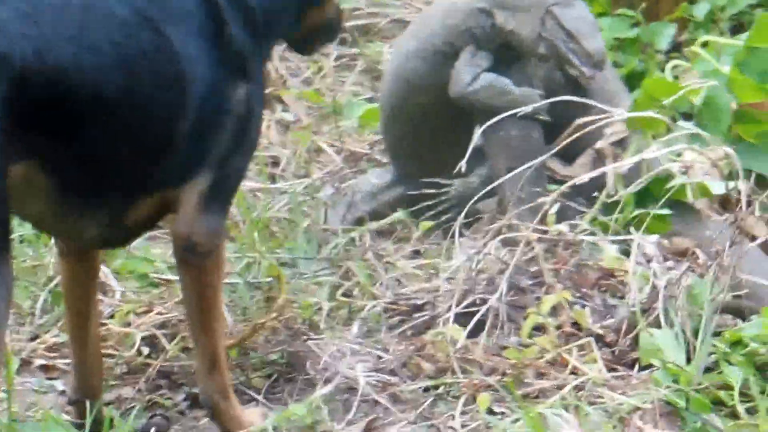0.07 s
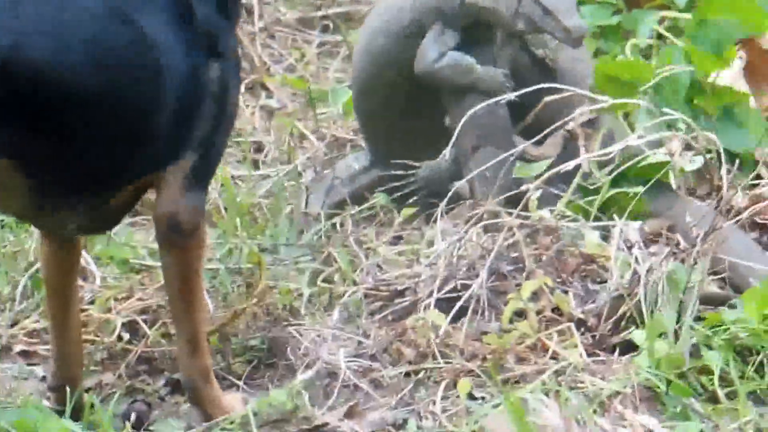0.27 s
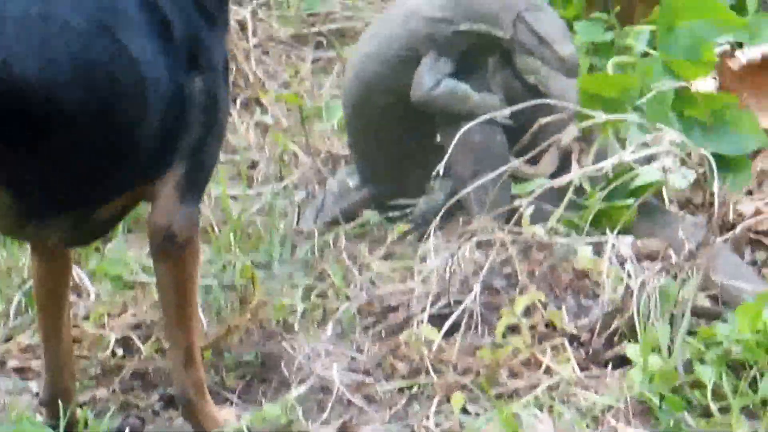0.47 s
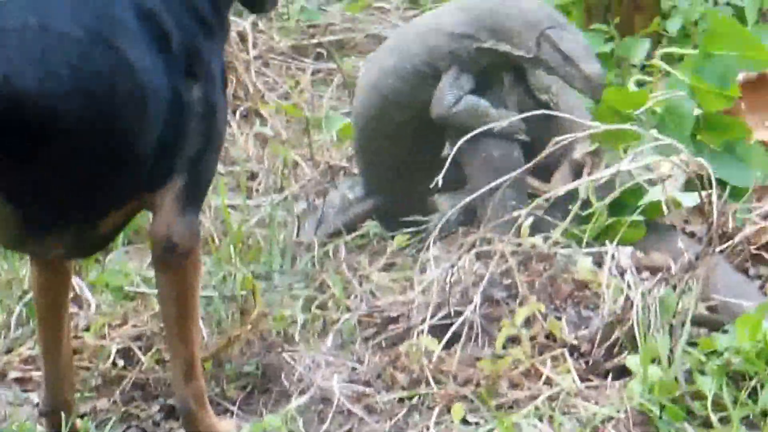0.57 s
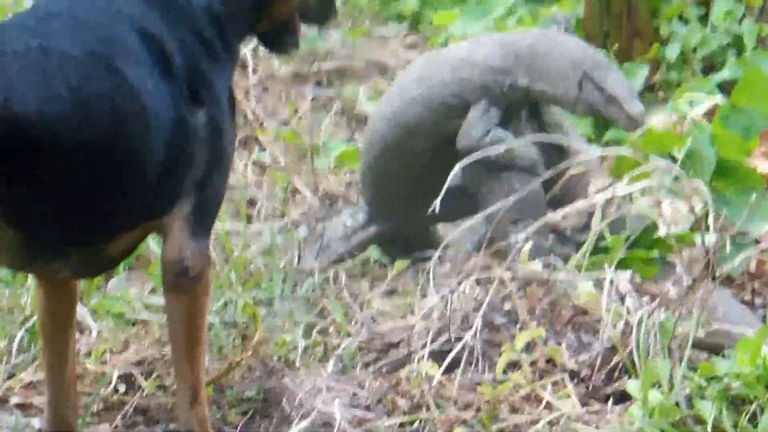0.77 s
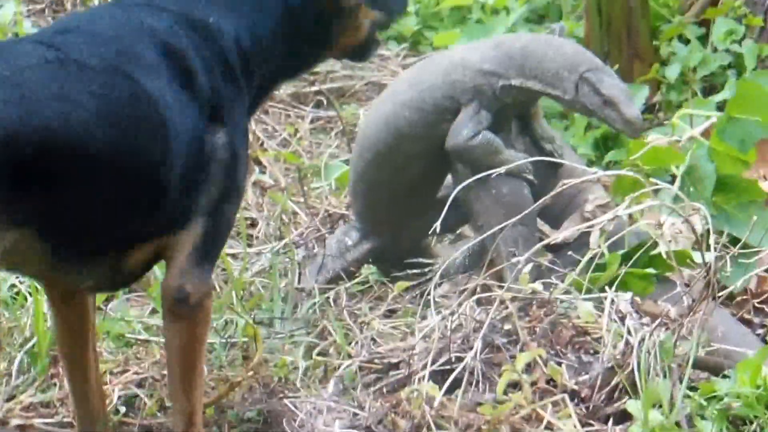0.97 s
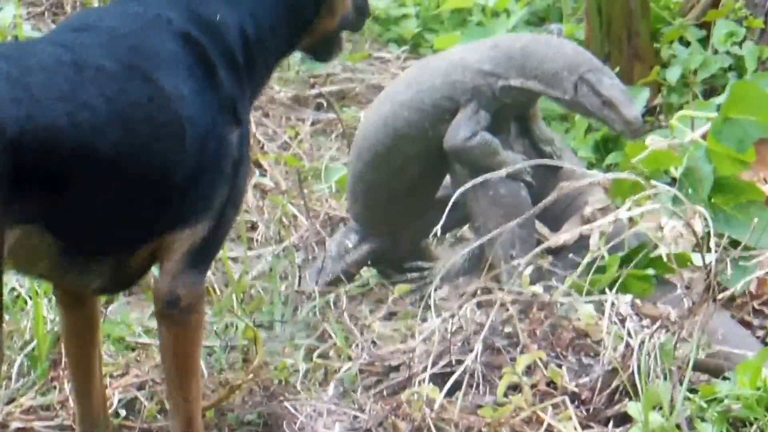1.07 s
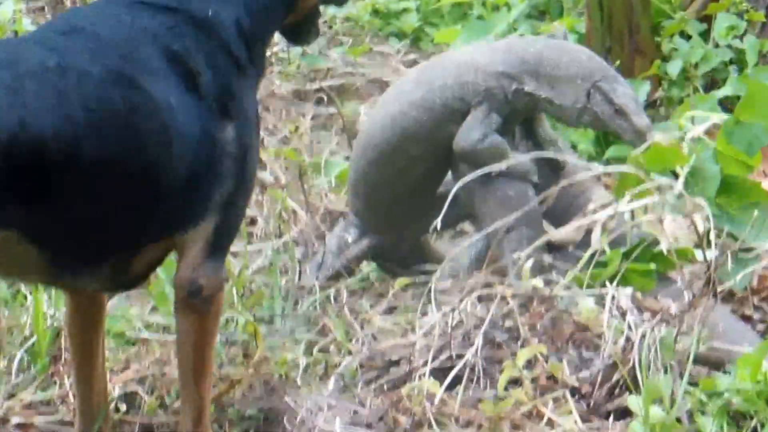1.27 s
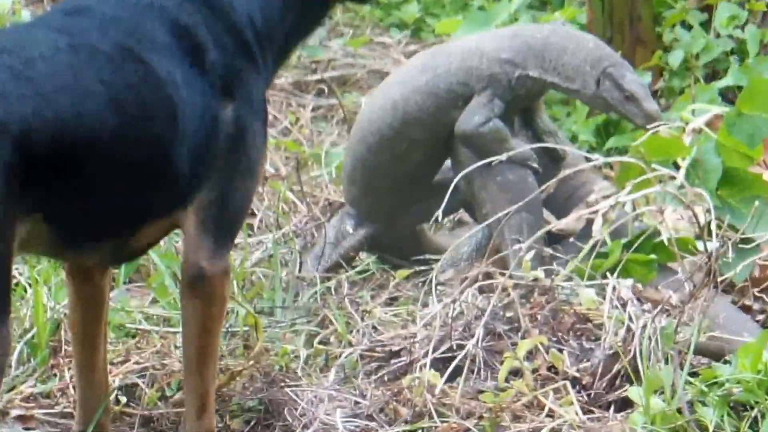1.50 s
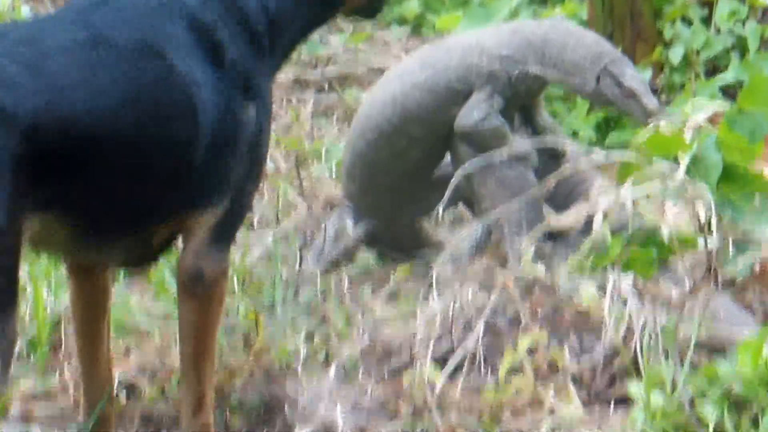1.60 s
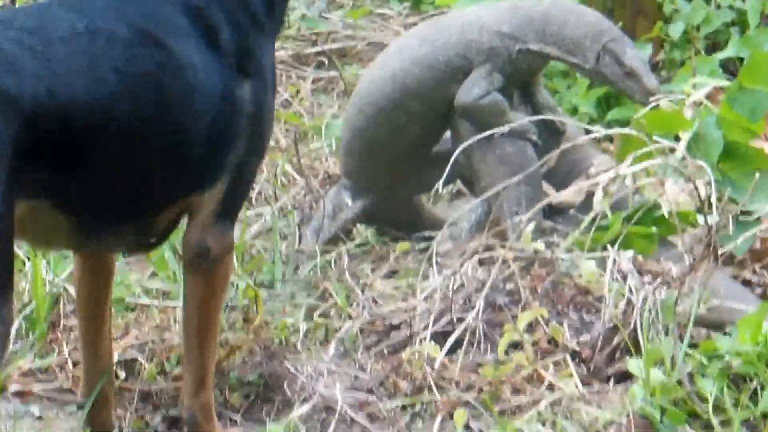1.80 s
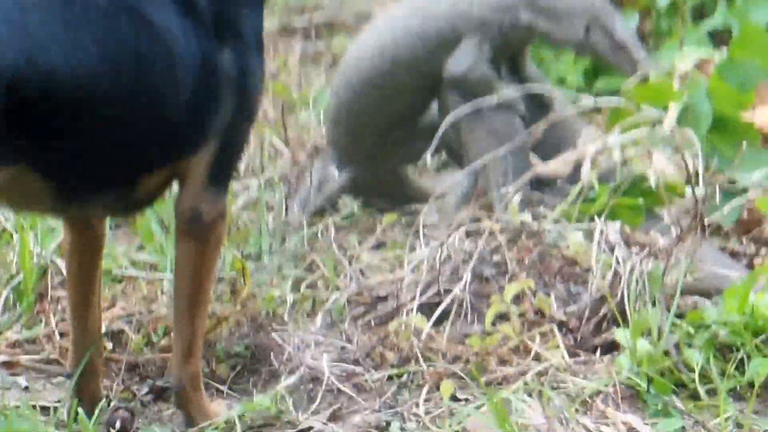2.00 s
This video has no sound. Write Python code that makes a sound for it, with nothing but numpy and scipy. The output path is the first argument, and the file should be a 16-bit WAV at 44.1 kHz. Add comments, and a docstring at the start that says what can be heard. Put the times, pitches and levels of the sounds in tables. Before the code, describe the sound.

A dog barks loudly close to the microphone in a garden. After a faint dry grass rustle, single raspy barks come at 0.2 and 0.55 seconds, then quick pairs at about 1.0 to 1.2 and 1.55 to 1.8 seconds. The peaks crackle and each bark echoes lightly. A distant dog answers faintly near 0.8 and 1.3 seconds. Soft outdoor air and faint insect hiss continue underneath.

```python
"""A garden, with a dog close to the microphone, a little to the right. It barks six times: two single
barks, then two quick pairs, its vocal folds buzzing and rasping as the mouth opens. The loudest peaks
overflow the recorder and crackle. Nearby plants and walls and the far surroundings throw the barks back,
and a dog answers from a distance. Dry grass rustles underfoot; insects hiss faintly in the soft air."""
import sys
import numpy as np
from scipy import signal
from scipy.fft import rfft, irfft, next_fast_len
from scipy.io import wavfile
from scipy.ndimage import uniform_filter1d

SR = 44100
rng = np.random.default_rng(int(sys.argv[2]) if len(sys.argv) > 2 else 0)


def persist_wave(psi):
    """Save psi, clipped to +-1, as 16-bit WAV."""
    counts = np.round(np.clip(psi, -1, 1) * 32767).astype(np.int16)
    wavfile.write(sys.argv[1], SR, np.atleast_2d(counts).T)


N = 90404


def amp(db):
    """Decibels as an amplitude factor."""
    return 10 ** (np.asarray(db) / 20)


def unit(x):
    """The signal at rms 1."""
    return x / np.sqrt(np.mean(x ** 2) + 1e-20)


def read(points, hz):
    """The value of a (frequency, value) curve at hz, on a log frequency axis."""
    f, value = np.transpose(points)
    return np.interp(np.log(hz + 1), np.log(f), value)


def add(mix, start_s, sound):
    """Lays a sound into the mix."""
    part = mix[max(round(start_s * SR), 0):][:len(sound)]
    part += sound[:len(part)]


def colour(x, spectrum):
    """Filters a sound by a (frequency [Hz], gain [dB]) curve, then sets it to rms 1."""
    size = next_fast_len(2 * len(x))
    gain = amp(read(spectrum, np.fft.rfftfreq(size, 1 / SR)))
    return unit(irfft(rfft(x, size) * gain, size)[:len(x)])


def wander(size, hz):
    """A smooth random drift up to about hz, at an rms near 1."""
    f = np.fft.rfftfreq(N, 1 / SR)
    return unit(irfft(rfft(rng.standard_normal(N)) * np.exp(-(f / hz) ** 2), N))[:size]


def air_and_insects():
    """Soft outdoor air and a narrow, wavering insect hiss, partly alike in both channels."""
    # spectrum of the open air: (frequency [Hz], relative level [dB])
    air_spectrum = [(30, -11), (200, -11), (330, -10), (600, -11), (1500, -13), (2800, -16.5), (5000, -24),
                    (9000, -30.5), (14000, -34.5)]
    air_db, insect_db, insect_hz, insect_width_hz = -51.5, -63.5, 7100, 440
    shared = rng.standard_normal(N)
    air = np.array([colour(shared + 1.2 * rng.standard_normal(N), air_spectrum) for _ in range(2)])
    band = np.exp(-((np.fft.rfftfreq(N, 1 / SR) - insect_hz) / insect_width_hz) ** 2)
    insects = unit(irfft(rfft(rng.standard_normal((2, N)) + shared) * band, N))
    return amp(air_db + wander(N, 7.1)) * air + amp(insect_db + 2 * wander(N, 2.6)) * insects


def echoes(x, t60, build_s):
    """Scattered stereo reflections build up, then each band dies at its own speed."""
    shared = rng.standard_normal(N)
    hz, t, bands = signal.stft(shared + 0.39 * rng.standard_normal((2, N)), SR, nperseg=256)
    decay = amp(-60 * t / read(t60, hz)[:, None])
    tail = signal.istft(bands * decay, SR, nperseg=256)[1][:, :N]
    tail *= 1 - np.exp(-(np.arange(N) / SR / build_s) ** 2)
    mids = signal.sosfilt(signal.butter(2, [500, 2500], "band", fs=SR, output="sos"), tail)
    mid_gain = np.sqrt((mids ** 2).sum(1, keepdims=True) * SR / 4000)
    return signal.fftconvolve(x[None], tail / mid_gain, axes=1)[:, :N]


def garden(x):
    """The garden throws sound back: a short slap from close by, a faint long tail from far off."""
    # decay off nearby plants and walls: (frequency [Hz], time to fall 60 dB [s])
    near_t60 = [(200, 0.17), (1200, .26), (3000, 0.29), (8000, 0.26), (14000, 0.16)]
    # decay off the far surroundings: (frequency [Hz], time to fall 60 dB [s])
    far_t60 = [(200, 1.9), (700, 1.7), (1400, 1.64), (3000, 2), (5000, 0.62), (12000, 0.3)]
    return amp(-11.5) * echoes(x, near_t60, build_s=0.0074) + amp(-25) * echoes(x, far_t60, build_s=0.038)


def grass():
    """Dry stalks crackle underfoot in short clumps."""
    # clumps of crackle: (start [s], length [s], level [dB], centre [Hz])
    rustles = [(0.079, 0.028, -43, 2220), (0.109, 0.072, -41.5, 1590), (0.158, 0.048, -48.5, 1470),
               (1.984, 0.009, -44, 1380)]
    # spectrum of dry stalks: (frequency [Hz], relative level [dB])
    stalk_spectrum = [(60, -27), (400, 3), (1500, 10), (3500, 4), (6000, 4.5), (14000, -7.5)]
    out = np.zeros(N)
    for start, length, db, hz in rustles:
        progress = np.arange(0, length, 1 / SR) / length
        crackle = rng.standard_normal(N) * amp(2 * wander(N, 370))
        grains = colour(crackle[:len(progress)], stalk_spectrum)
        body = signal.lfilter(*signal.iirpeak(hz, Q=1.5, fs=SR), grains)
        add(out, start, amp(db) * np.sin(np.pi * progress ** 0.37) * unit(body + 0.29 * grains))
    return out


def voice(hz, rough, tone, rasp):
    """Vocal folds that jitter and flutter as they turn rough, plus air that puffs once a cycle."""
    jitter_share, jitter_hz = .04, 126.2  # unsteady pitch, at full roughness
    flutter_depth, flutter_hz = .7, 140.4  # a second, slower vibration in the throat
    size, rough = len(hz), np.clip(rough, 0, 1)
    hoarse = np.sqrt(rough)
    phase = 2 * np.pi * np.cumsum(hz * (1 + jitter_share * rough * wander(size, jitter_hz))) / SR
    folds = unit(sum(amp(read(tone, k * hz) + 4.5 * hoarse * wander(size, 40)) * np.cos(k * phase + k * k)
                     for k in range(1, 13)))
    flutter = np.sin(2 * np.pi * np.cumsum(flutter_hz * (1 + .25 * wander(size, 60))) / SR)
    puffs = colour((1 + .7 * np.cos(phase)) * rng.standard_normal(N)[:size], rasp)
    return np.sqrt(1 - rough) * folds * (1 + flutter_depth * hoarse * flutter) + hoarse * puffs


def far_dog():
    """Short dull calls from a distance, each one gentle arch of level and pitch."""
    # distant barks: (start [s], length [s], level [dB], pitch [Hz], roughness [0-1])
    calls = [(0.75, 0.076, -30.5, 634, 0.23), (0.791, 0.14, -34.5, 600, 0.9),
             (1.327, 0.14, -35.5, 673, 0.02)]
    # the voice heard from afar: (frequency [Hz], relative level [dB])
    spectrum = [(300, -52), (500, 3), (650, 6.5), (900, 0.5), (1200, 12), (1500, -22.5), (1780, 6.5),
                (2200, -24), (5000, -62.5)]
    out = np.zeros(N)
    for start, length, db, hz, rough in calls:
        arch = np.sin(np.pi * np.arange(0, length, 1 / SR) / length)
        pitch = hz * (1 + 0.01 * (arch - 1))
        add(out, start, amp(db) * arch ** .5 * voice(pitch, rough, spectrum, spectrum))
    return out


def groans():
    """The near dog's slack folds slide faintly up into a bark and down after it."""
    # slides of the folds: (start [s], start pitch [Hz], end pitch [Hz])
    slides = [(0.187, 208, 340), (0.326, 426, 223), (0.507, 148, 293), (0.677, 463, 203), (0.925, 145, 313),
              (1.229, 440, 190), (1.51, 172, 341), (1.793, 490, 199)]
    level_db, length_s = -47.5, 0.0633
    progress = np.arange(0, length_s, 1 / SR) / length_s
    envelope = amp(level_db) * np.sin(np.pi * progress) ** .5
    out = np.zeros(N)
    for start, start_hz, end_hz in slides:
        hz = start_hz * (end_hz / start_hz) ** progress
        add(out, start, envelope * np.sin(2 * np.pi * np.cumsum(hz) / SR))
    return out


def mouth(x, mouth_db):
    """As the mouth opens, the treble rises and a snarling resonance stands out; the level is held even."""
    treble_hz, snarl_hz = 963, 2522
    low = signal.sosfiltfilt(signal.butter(3, treble_hz, fs=SR, output="sos"), x)
    opened = low + (x - low) * amp(mouth_db)
    snarl = signal.lfilter(*signal.iirpeak(snarl_hz, Q=7.2, fs=SR), opened)
    shaped = opened + snarl * (amp(0.83 * mouth_db) - 1)
    return shaped / np.sqrt(uniform_filter1d(shaped ** 2, size=400) + 1e-9)


def bark(curve):
    """One bark and its start time: the voice leaves the mouth under a throbbing, uneven effort."""
    # harmonics of the voice: (frequency [Hz], relative level [dB])
    tone = [(400, -41), (560, -2), (680, 0), (1000, 0.5), (1250, 5.5), (1450, -1), (1950, -14.5),
            (2200, -7.5), (2550, -15.5), (3300, -17), (4300, -38), (8000, -43)]
    # breath rasping around them: (frequency [Hz], relative level [dB])
    rasp = [(200, -36), (480, -19.5), (600, -2), (790, 0.5), (1000, -6.5), (1270, 1.5), (1550, -6),
            (1850, -5.5), (2080, -10.5), (2420, -8.5), (3000, -22.5), (3400, -18), (4500, -35), (9000, -35),
            (14000, -47.5)]
    throb_db, throb_hz, surge_db, surge_hz = 1.37, 54.79, 1.0, 68.4
    low_cut_hz, low_leak_db = 490, -10  # the dog radiates very little below its pitch
    times, *columns = np.transpose(curve)
    t = np.arange(times[0], times[-1], 1 / SR)
    level_db, hz, rough, mouth_db = (np.interp(t, times, column) for column in columns)
    call = mouth(voice(hz, rough, tone, rasp), mouth_db)
    fades = np.minimum(np.minimum(t - t[0], t[-1] - t) / 0.00077, 1)
    throb = np.cos(2 * np.pi * throb_hz * (t - t[np.argmax(level_db)])) - .5  # crests at the peak effort
    call *= fades * amp(level_db + throb_db * throb + surge_db * wander(len(t), surge_hz))
    radiated = signal.sosfiltfilt(signal.butter(6, low_cut_hz, "high", fs=SR, output="sos"), call)
    return t[0], radiated + amp(low_leak_db) * (call - radiated)


def near_dog():
    """Six barks close to the microphone, each swelling fast and falling away."""
    # one curve a bark: (time [s], level [dB], pitch [Hz], roughness [full at 1], mouth treble gain [dB])
    barks = [
        [(.197, -44, 618.9, 1.07, -16), (.226, -14.5, 622.2, 0.46, -0.5), (.253, -6, 695.9, 0.36, -6.5),
         (.280, -7, 641.4, 0.39, 5.5), (.305, -6, 677.6, 0.37, 4), (.328, -18.5, 661.4, 0.46, -4.5),
         (.360, -33, 523, 0.87, -6)],
        [(.535, -35, 561.9, 0.52, -21), (.564, -9.5, 580.6, 0.74, -9), (.596, -8, 638.7, 0.49, 2.5),
         (.620, -8.5, 649, 0.17, 8), (.652, -11, 653.2, 0.06, 9), (.695, -36.5, 675, 0.37, -4)],
        [(.938, -36.5, 647.6, 0.11, -6), (.954, -23, 642.3, 0.19, -15), (.966, -25.5, 648.9, 0.92, -2),
         (.990, -7.5, 644.7, 0.48, 9.5), (1.038, -6, 642.8, 0.47, 9.5), (1.066, -9.5, 603.6, 0.4, 4),
         (1.086, -16.5, 579, 0.2, 3), (1.120, -22, 536, 0.7, -36)],
        [(1.118, -31, 653.3, 0.16, 7), (1.149, -5, 725, 0.26, -18.5), (1.160, -12, 716.2, 0.48, -2.5),
         (1.180, -8, 709, 0.73, 1), (1.213, -10, 689.7, 0.19, 3.5), (1.232, -20.5, 663.6, 0.1, 0),
         (1.262, -43, 537, 1.1, 6)],
        [(1.543, -34.5, 685.2, 0.9, -4), (1.564, -14.5, 663.2, 0.67, 1), (1.582, -6.5, 633, 0.59, 0),
         (1.612, -7, 640.6, 0.41, -4), (1.645, -7.5, 612.8, 0.16, 3), (1.668, -14.5, 598.2, 0.4, 0),
         (1.695, -15.5, 595.4, 0.5, 0)],
        [(1.678, -38, 639.6, 0.46, -2), (1.693, -10, 672, 0.1, -12), (1.736, -10, 729.6, 0.59, 6.5),
         (1.750, -9, 733, 0.19, 14), (1.769, -9.5, 690, 0.04, 5), (1.786, -18.5, 665, 0.35, 4),
         (1.845, -33.5, 719, 0, 13)],
    ]
    out = np.zeros(N)
    for curve in barks:
        add(out, *bark(curve))
    return out


def scene():
    """Dogs and grass sound into the garden, all a little to the right, over the air and insects."""
    balance_db = 0.6663
    direct = near_dog() + groans() + far_dog() + grass()
    return (direct + garden(direct)) * amp([[-balance_db], [balance_db]]) + air_and_insects()


def record(dry):
    """In the recorder, peaks past full scale wrap to the opposite sign and crackle; the top is then cut."""
    edge_hz = 14600
    wrapped = (dry + 1) % 2 - 1
    band_limit = signal.firwin(255, edge_hz, window=("kaiser", 7), fs=SR)
    return signal.oaconvolve(wrapped, band_limit[None], "same")


dry = scene()
out = record(dry)
persist_wave(out)
```